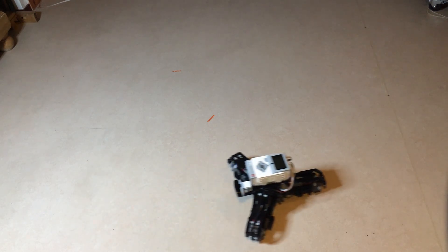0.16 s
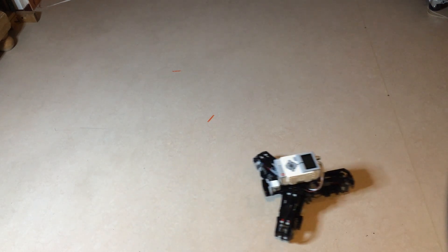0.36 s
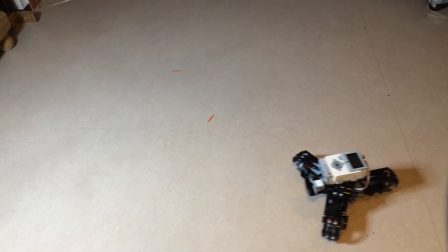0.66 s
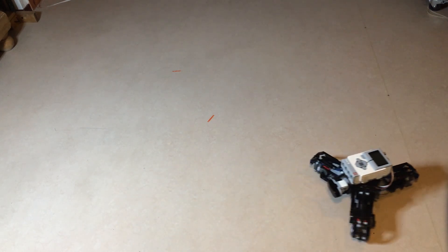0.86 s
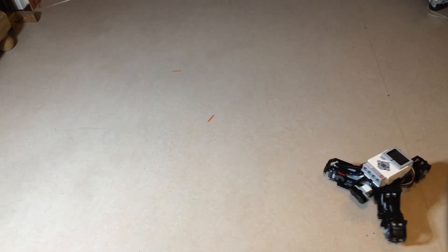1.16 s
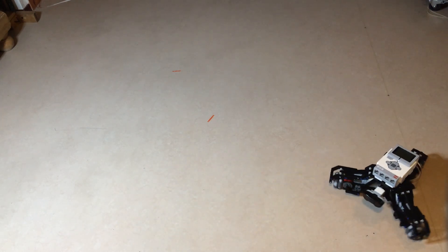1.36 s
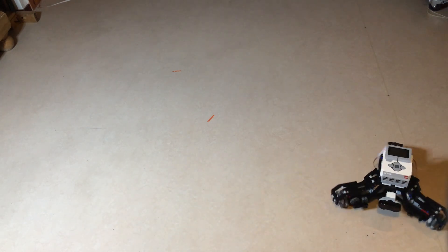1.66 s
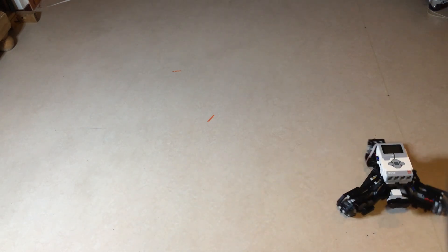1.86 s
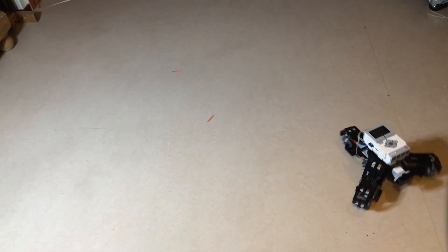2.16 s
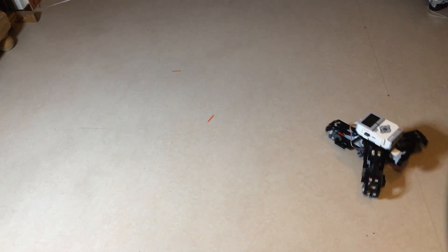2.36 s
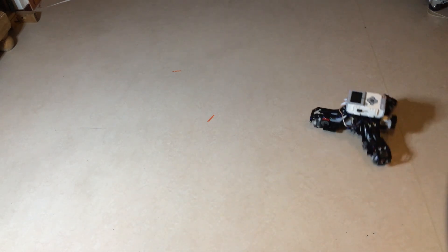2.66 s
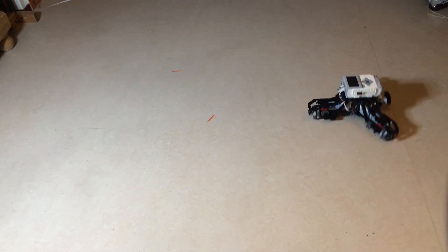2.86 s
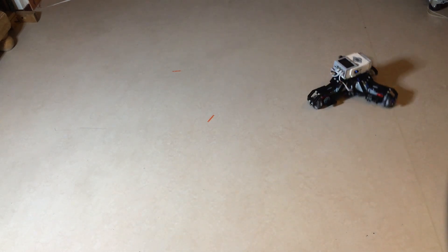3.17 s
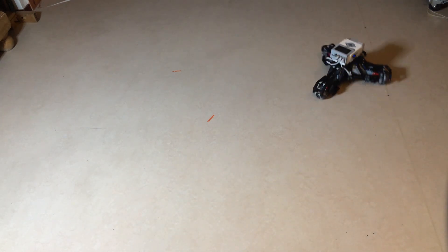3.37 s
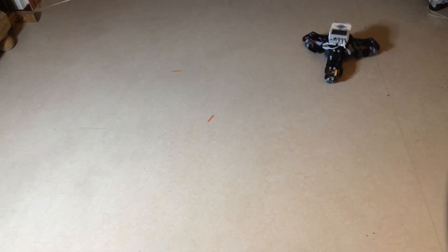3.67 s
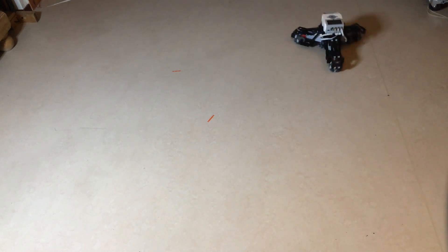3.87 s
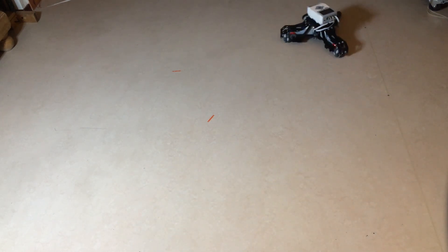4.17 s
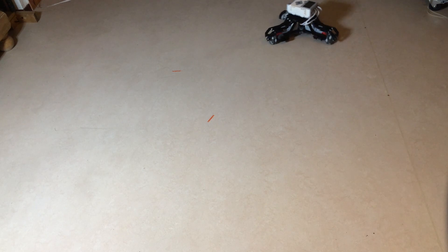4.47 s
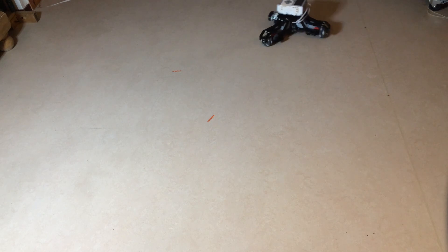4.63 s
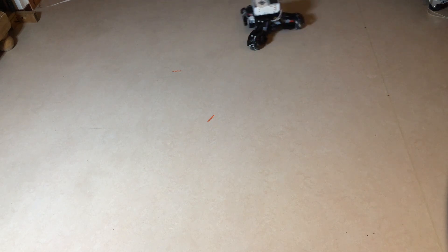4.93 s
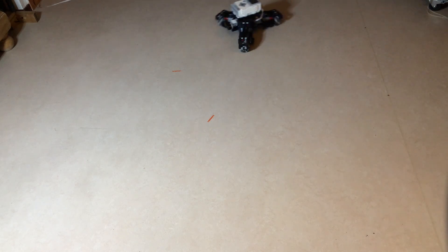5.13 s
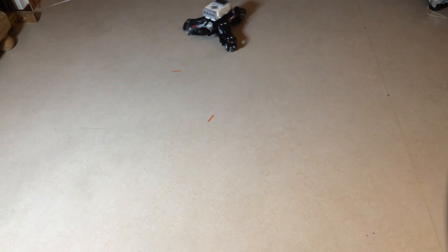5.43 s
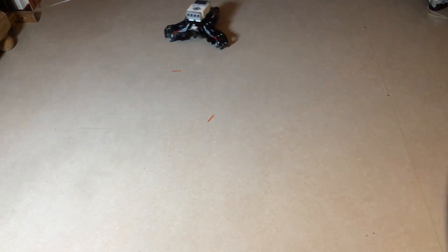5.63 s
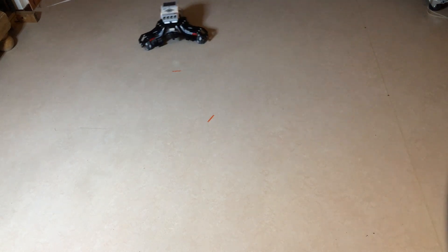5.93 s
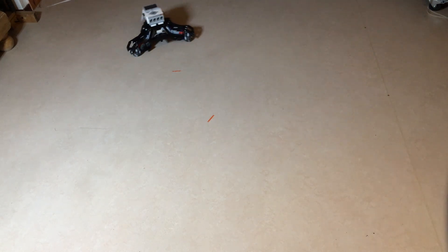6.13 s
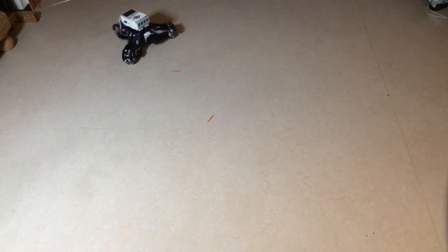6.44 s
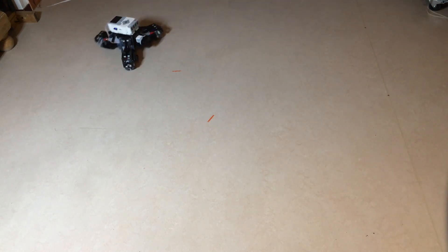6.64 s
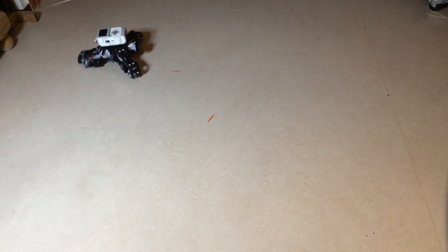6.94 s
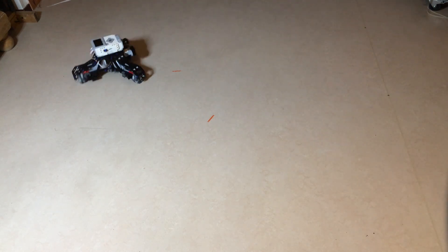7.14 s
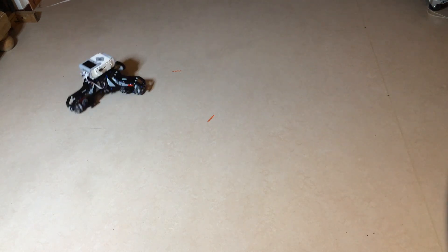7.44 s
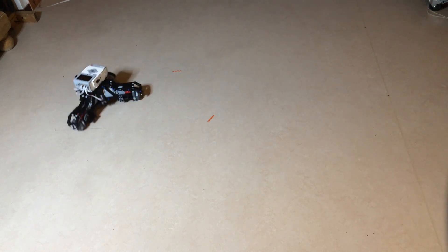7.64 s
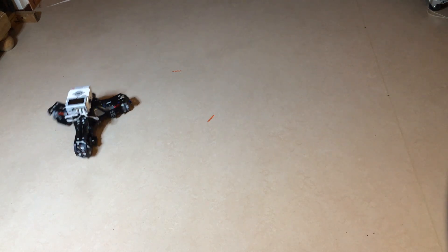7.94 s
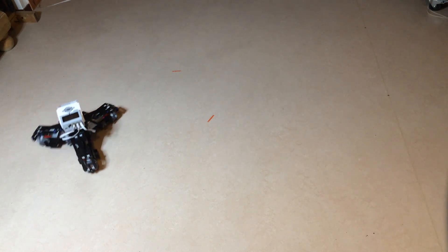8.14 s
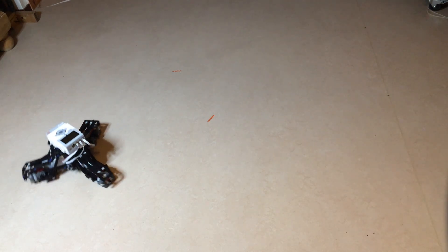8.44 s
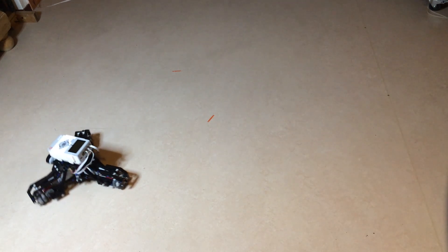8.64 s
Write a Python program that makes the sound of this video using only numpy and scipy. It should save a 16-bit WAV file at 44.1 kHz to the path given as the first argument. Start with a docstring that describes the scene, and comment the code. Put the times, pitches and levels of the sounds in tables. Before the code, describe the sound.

Buzzy electric whirring from a toy robot starts high and busy, glides down to a duller, quieter growl, then revs back up in brighter uneven waves until the end. Gritty gear rattle, tiny ticks and scraping hiss cling to the nasal whine, while a second lower motor swells now and then. The sound is continuous, heard by a fixed microphone in a small room with short echoes and soft low hum.

```python
"""A three-wheeled toy robot spins and drifts in a wide loop over a bare floor, in a quiet humming room.
At first all three geared motors whine and rattle; by 2 s the third has faded and the fastest has slowed.
From then until the end at 8.8 s the fastest speeds up and slows down again and again, while a slower motor
surges at about 2, 3, 5.3, 7.6 and 8.8 s. The whines are harmonics of the rate at which gear teeth meet; the
rattle is filtered noise, ticks and blurred harmonics. Both channels are the same."""
import sys
import numpy as np
from scipy import signal
from scipy.fft import rfft, irfft
from scipy.io import wavfile
from scipy.ndimage import uniform_filter1d

SR = 44100
rng = np.random.default_rng(int(sys.argv[2]) if len(sys.argv) > 2 else 0)


def dump(signal):
    """Clip the signal to [-1, 1] and save it as 16-bit WAV at the path in sys.argv[1]."""
    limited = np.clip(np.atleast_2d(signal).T, -1, 1)
    pcm = np.round(limited * 32767).astype(np.int16)
    wavfile.write(sys.argv[1], SR, pcm)


N = 388080
TIME = np.arange(N) / SR  # seconds

# speed of the fastest motor at each moment: (time [s], tooth rate [Hz])
LEAD_SPEED = [(0.0, 975), (0.6, 981.0), (0.75, 895), (1.0, 762), (1.13, 668.0), (1.32, 581), (1.95, 537),
              (2.05, 566), (2.15, 728), (2.4, 797), (2.59, 953), (2.68, 945), (3.0, 673.3), (3.17, 777.5),
              (3.28, 901), (3.37, 900.0), (3.45, 979), (3.72, 975.5), (3.86, 942.0), (4.02, 821.0),
              (4.13, 777.6), (4.55, 790.7), (4.65, 758.5), (4.8, 813.4), (5.0, 877), (5.23, 764.5),
              (5.3, 679), (5.64, 939.6), (5.83, 999), (5.95, 985), (6.39, 791.3), (6.55, 772.4),
              (6.72, 813), (6.85, 778.5), (7.03, 860), (7.16, 831), (7.4, 919), (7.52, 732.5), (7.62, 692),
              (7.92, 925.0), (8.15, 1000), (8.25, 902), (8.48, 867), (8.8, 771)]
# its whine, before the housing colours it: (time [s], level [dB])
LEAD_WHINE = [(0.0, -52), (0.6, -61), (1.05, -75), (1.75, -64), (2.15, -55.5), (2.65, -47.5), (2.95, -57.5),
              (3.28, -46.5), (3.52, -50.5), (4.6, -52), (5.7, -50), (6.25, -51.5), (6.6, -47), (7.35, -51),
              (7.55, -52), (8.0, -48), (8.8, -56.5)]
# how the housing colours that whine: (frequency [Hz], gain [dB])
WHINE_COLOUR = [(1000.0, -7.5), (1500.0, -2.5), (1850.0, 1), (2100.0, -0.5), (2400.0, -0.5), (2900.0, 2.5),
                (3200.0, -3.5), (3600.0, -5), (3920.0, -4), (4400.0, -9), (4800.0, -4.5), (5450, -3.5),
                (6200, -8), (7000, -9.5), (9000, -20)]
# as the body turns, one harmonic flares up or drops out for a moment;
# harmonic number: (time of the middle [s], length [s], change [dB])
HARMONIC_FLARES = {2: [(.8, .25, 8.5), (1.97, 0.092, 12.5), (2.17, .07, 9), (3.13, .1, 6), (3.78, .12, 9.5),
                   (4.97, 0.079, 7.5), (7.1, .4, -4), (7.39, 0.11, 7.5), (8.05, .32, 6), (8.46, .3, 9.5),
                   (8.76, .08, 10)], 3: [(.21, .32, 3.5), (1.22, 0.29, 15), (1.86, .25, 6), (2.28, .16, -6),
                   (2.55, .25, 3), (3.17, .15, -11), (3.72, .12, 9), (5.53, .06, 6), (6.52, .2, 7),
                   (7.19, .23, 7), (7.5, 0.071, 7)], 4: [(.15, .25, 5), (2.32, .3, -1), (3.2, .16, 4.5),
                   (3.58, 0.24, -14), (4.3, .24, 8.5), (4.82, .24, 13.5), (5.14, .14, 12), (5.48, 0.12, 8),
                   (6.1, 0.44, -25), (7.29, .12, 12.5)], 5: [(1.6, 0.72, -13), (2.08, 0.097, 6),
                   (3.28, .11, 7), (3.58, 0.28, -14), (4.01, .14, -18), (4.4, .13, 8.5), (5.77, .22, 3),
                   (6.65, 0.22, 4.5)]}
# weaker tones, the tooth rate itself and uneven multiples of it:
# (multiple of the tooth rate [times], relative level [dB])
WEAK_TONES = [(1.0, -67), (1.7, -59), (2.3, -62), (3.8, -80), (5.171, -58), (9.25, -53)]
# how well the housing sends out a gear tone: (frequency [Hz], gain [dB])
RADIATION = [(600, -37), (850, -11.5), (1200, -12.5), (1450, -8.5), (1800, -5.5), (2400, -18.5),
             (3000, -7.5), (4200, -10), (7300, -25.5), (9000, -9)]
# a slower motor speeds up from a crawl and drops back:
# (time of the peak [s], tooth rate [Hz], rise [s], fall [s], level before the housing [dB])
SURGES = [(.2, 558.3, 1.6, 1.53, -53.5), (2.08, 565, .25, 1.74, -63.5), (2.98, 690, .42, .24, -49),
          (5.3, 698, .21, .32, -48), (7.56, 695, .14, .5, -48), (8.8, 603.4, 1.1, 0.72, -60)]
# third motor, as the robot sets off: (time [s], tooth rate [Hz], level before the housing [dB])
THIRD_MOTOR = [(0, 616, -48), (.6, 608, -47.5), (1.0, 515.3, -55), (1.4, 425.7, -57), (2.2, 400, -85)]
# gear rattle, used as changes from its usual levels:
# (time [s], upper-middle level [dB], treble level [dB])
RATTLE_LEVELS = [(0.0, -48.5, -56), (0.12, -47, -60), (0.73, -48, -54.5), (1.27, -57, -61),
                 (1.86, -56.5, -62), (2.13, -50, -54), (2.62, -45, -51.5), (3.01, -48.5, -54),
                 (3.36, -48, -50.5), (3.58, -52, -49), (3.7, -49, -48.5), (4.07, -55, -55.5),
                 (4.31, -52, -52.5), (4.48, -54, -55), (4.88, -50, -54.5), (4.97, -49, -50.5),
                 (5.51, -46.5, -52), (6.57, -53, -55), (7.08, -50, -49), (7.38, -46.5, -49),
                 (7.6, -48.5, -52.5), (7.89, -46, -50), (8.6, -48.5, -46), (8.8, -46.5, -52.5)]
# middles of the four rattle bands: (frequency [Hz])
RATTLE_BAND_HZ = [1700, 3920, 8400, 13100]
# basic colour of the rattle: (frequency [Hz], gain [dB])
RATTLE_COLOUR = [(290, -58), (500, -24.5), (637, -25), (1170, -12.5), (1830, -0.5), (2430, -3), (3270, 1.5),
                 (3610, 1), (3940, -0.5), (4350, -1.5), (4800, 1), (6570, -3.5), (12100, -3), (14200, -8.5),
                 (15000, -13)]
# resonances of the plastic housing: (frequency [Hz], width [Hz], lift [dB])
HOUSING = [(1720, 180, 0.5), (3000, 160, 1), (3920, 320, 3.5), (5140, 420, 2), (5430, 300, 2.5),
           (7090, 840, 3), (8200, 220, 0.5)]
# colour of the soft noise in the room: (frequency [Hz], relative level [dB])
ROOM_TONE = [(15, -41), (25, -37), (49, -8), (113, -9.5), (140, -5.5), (182, -4.5), (211, -4), (254, -9),
             (399, -9.5), (448, -13.5), (541, -12.5), (634, -18), (800, -14.5), (1040, -11), (1760, -120)]
# steady hum in the room: (frequency [Hz], relative level [dB])
HUM = [(58, -80.5), (90, -78.5), (120, -75.5), (172, -78), (213, -69)]

FADE_DB, FADE_HZ = 1.6, 3.3  # each whine harmonic also swells and fades by chance
HIGH_DB = -1  # trim of the lead motor's high harmonics
CRAWL_HZ, CRAWL_DB = 396.3, -69  # the slower motor between surges, before the housing
RATTLE_USUAL_DB, TREBLE_USUAL_DB = -52, -54.5  # table levels that count as no change
CRUISE_HZ, DULL_DB_PER_OCTAVE = 843, 5  # slower gears have more low rattle
LOW_LIFT_DB, MIDDLE_LIFT_DB = 3, -2.3
LOW_SHARE, MIDDLE_SHARE, TILT_SHARE = 0.88, 0.72, 0.31  # how far the bands follow the levels
SOLO_THIN_DB = 3  # a motor running alone leaves less low rattle
ROOM_TONE_DB = -69.5
EDGE_HZ = 15300  # top of the treble


def gain_of(db):
    """Turns decibels into a factor for loudness of a wave (its amplitude)."""
    return 10 ** (np.asarray(db) / 20)


def evened(x):
    """Scales a signal to an average strength (rms) of 1."""
    return x / np.sqrt(np.mean(x ** 2) + 1e-20)


def curves(rows):
    """Joins the points of each time-table column with straight lines, sample by sample."""
    times, *columns = np.transpose(rows)
    return [np.interp(TIME, times, column) for column in columns]


def read(points, hz):
    """Reads a frequency table at hz, with octaves evenly spaced."""
    frequencies, values = np.transpose(points)
    return np.interp(np.log(hz + 1), np.log(frequencies + 1), values)


def coloured(x, db_at):
    """Makes each frequency louder or softer by db_at(frequency) decibels."""
    hz = np.fft.rfftfreq(N, 1 / SR)
    return irfft(rfft(x) * gain_of(db_at(hz)), N)


def wander(rate_hz):
    """Slow random motion of rms 1, with little movement faster than rate_hz."""
    count = N // 32  # a coarse time grid is enough
    hz = np.fft.rfftfreq(count, N / SR / count)
    spectrum = rfft(rng.standard_normal(count)) / (1 + (hz / rate_hz) ** 2)
    slow = evened(irfft(spectrum, count))
    return np.interp(TIME, np.linspace(0, N / SR, count), slow)


def tooth_phase(hz, wobble, wobble_hz):
    """Angle of the tooth cycle; the uneven load makes the speed wobble."""
    wobbling_hz = hz * (1 + wobble * wander(wobble_hz))
    return 2 * np.pi * np.cumsum(wobbling_hz) / SR


def gear_tone(phase, rough, rough_hz):
    """One harmonic of meshing gears; unequal teeth scatter its strength and phase."""
    turn = phase + rng.uniform(0, 2 * np.pi)
    in_step = (1 + rough * wander(rough_hz)) * np.cos(turn)
    out_of_step = rough * wander(rough_hz) * np.sin(turn)
    return evened(in_step + out_of_step)


def whine_db(k, hz):
    """Level of tooth harmonic k as it glides through the housing's colour, flares and fades."""
    level_db, = curves(LEAD_WHINE)
    flares_db = sum(db * np.exp(-(2 * (TIME - middle) / length) ** 2)
                    for middle, length, db in HARMONIC_FLARES.get(k, []))
    return level_db + read(WHINE_COLOUR, k * hz) + flares_db + FADE_DB * wander(FADE_HZ)


def lead_motor(phase, hz, effort_db, solo):
    """Strong tooth harmonics, higher ones that grow with solo, and faint tones that follow the gear load."""
    grip = gain_of(0.34 * wander(38))  # the teeth press and slacken
    rough = 0.75 - 0.26 * solo  # the other motors shake the gears
    whine = sum(gain_of(whine_db(k, hz)) * gear_tone(k * phase, rough, rough_hz=51.0)
                for k in range(2, 6))
    high = sum(gain_of(whine_db(k, hz)) * gear_tone(k * phase, rough=0.43, rough_hz=40)
               for k in range(6, 11))
    faint = sum(gain_of(db + read(RADIATION, k * hz) + 2.6 * wander(2.7))
                * gear_tone(k * phase, rough=0.82, rough_hz=31.4) for k, db in WEAK_TONES)
    strong = grip * (whine + gain_of(HIGH_DB) * solo * high)
    return strong + gain_of(-3.5 + 0.7 * effort_db) * faint


def surging():
    """Tooth rate and level of the slower motor: it grows louder as each surge lifts it from a crawl."""
    nearness = np.array([np.exp(-np.maximum((peak - TIME) / rise, (TIME - peak) / fall))
                         for peak, _, rise, fall, _ in SURGES])
    _, top_hz, _, _, top_db = np.transpose(SURGES)[:, :, None]
    hz = CRAWL_HZ + np.max(nearness * (top_hz - CRAWL_HZ), axis=0)
    level_db = CRAWL_DB + np.max(nearness * (top_db - CRAWL_DB), axis=0)
    return hz, level_db


def slower_motor(hz, level_db):
    """The same kind of gears turning more slowly: tooth harmonics sent out by the housing."""
    phase = tooth_phase(hz, wobble=0.00585, wobble_hz=16.8)
    return sum(gain_of(level_db + read(RADIATION, k * hz)) * gear_tone(k * phase, rough=0.82, rough_hz=41.7)
               for k in (2, 3, 4, 5, 6, 8, 12))


def rattle_db(tooth_hz, solo):
    """Change of each rattle band: slow gears and several motors favour the low end; middle yields to treble."""
    level_db, treble_db = curves(RATTLE_LEVELS)
    level_db = level_db - RATTLE_USUAL_DB
    treble_db = treble_db - TREBLE_USUAL_DB
    dull_db = DULL_DB_PER_OCTAVE * np.log2(CRUISE_HZ / tooth_hz)
    low_db = LOW_LIFT_DB + LOW_SHARE * level_db + dull_db - SOLO_THIN_DB * solo
    middle_db = MIDDLE_LIFT_DB + MIDDLE_SHARE * level_db - TILT_SHARE * (treble_db - level_db)
    return [low_db, middle_db, level_db, treble_db]


def housing_db(hz):
    """Colour of the rattle: a broad hiss lifted at the housing's resonances."""
    lifts_db = sum(db / (1 + (2 * (hz - middle) / width) ** 2) for middle, width, db in HOUSING)
    return read(RATTLE_COLOUR, hz) + lifts_db


def dispersed(x, ring_s=0.003988):
    """The housing rings on briefly, holding each frequency back by its own time, up to ring_s."""
    hz = np.fft.rfftfreq(N, 1 / SR)
    delay_s = np.interp(hz, np.linspace(0, SR / 2, num=120), ring_s * rng.random(size=120))
    turn = 2 * np.pi * np.cumsum(delay_s) * SR / N  # adding up delays gives the phase
    return irfft(rfft(x) * np.exp(-1j * turn), N)


def patchy(x, depth_db=1.85, count=40):
    """Small patches of the rattle swell and fade at random over frequency and time."""
    _, _, spectrum = signal.stft(x, SR, nperseg=512)
    patches = uniform_filter1d(rng.standard_normal(spectrum.shape), size=4, axis=0)  # over frequency
    patches = uniform_filter1d(patches, size=count, axis=1)  # over time
    _, moving = signal.istft(spectrum * gain_of(depth_db * evened(patches)), SR, nperseg=512)
    return moving[:N]


def rattle_band(noise, weights):
    """The part of the noise around one rattle band, overlapping its neighbours."""
    points = list(zip(RATTLE_BAND_HZ, weights))
    return coloured(noise, lambda hz: 20 * np.log10(read(points, hz) + 1e-9))


def rattle(phase, tooth_hz, solo, bite=0.27, tick_share=0.38, ticks_per_s=700, flutter_db=0.37):
    """Loose teeth buzz and scrape; backlash and rollers add tiny ticks. The buzz grows with solo."""
    blur_hz = 8500
    # the teeth land unevenly, which blurs their highest harmonics into hiss
    harmonics = (gear_tone(k * phase, rough=3.5, rough_hz=45 + 7 * k) / (1 + (k * tooth_hz / blur_hz) ** 4)
                 for k in range(4, 13))
    buzz = 0.7 * evened(sum(harmonics))
    scrape = rng.standard_normal(N) * np.exp(bite * np.cos(phase))  # stronger once per tooth
    ticks = (rng.random(N) < ticks_per_s / SR) * rng.standard_normal(N)
    drive = evened(scrape) + solo * buzz + tick_share * evened(ticks)
    noise = evened(patchy(coloured(dispersed(drive), housing_db)))
    # the turning body shows different sides, so the colour shifts
    bands = [rattle_band(noise, weights) for weights in np.eye(len(RATTLE_BAND_HZ))]
    shaped = sum(gain_of(db + 0.83 * wander(25)) * band
                 for db, band in zip(rattle_db(tooth_hz, solo), bands))
    return gain_of(-45.5 + flutter_db * wander(30)) * shaped


def room(x, wet_db=-7, t60=0.34, drift_hz=1.0915, count=3):
    """Direct sound and short scattered echo tails, which trade places as the robot moves."""
    t = TIME[:SR // 2]
    wet = np.zeros(N)
    for k in range(count):
        sparse = (rng.random(len(t)) < 0.05) * (t > 0.003)  # echoes start after 3 ms
        tail = rng.standard_normal(len(t)) * sparse * gain_of(-60 * t / t60)  # 60 dB down after t60 s
        share = np.sqrt(2 / count) * np.cos(np.pi * (drift_hz * TIME + k / count))
        wet += signal.fftconvolve(x * share, tail / np.linalg.norm(tail))[:N]
    return (x + gain_of(wet_db) * wet) / np.hypot(1, gain_of(wet_db))


def room_tone():
    """Soft low filtered noise and a slightly unsteady hum of separate tones."""
    air = coloured(rng.standard_normal(N), lambda hz: read(ROOM_TONE, hz))
    hum = sum(gain_of(db) * gear_tone(2 * np.pi * hz * TIME, rough=0.083, rough_hz=4.3) for hz, db in HUM)
    return gain_of(ROOM_TONE_DB) * evened(air) + gain_of(-1.5) * hum


def scene():
    """The three motors and their rattle in the room."""
    lead_hz, = curves(LEAD_SPEED)
    lead_phase = tooth_phase(lead_hz, wobble=0.0055, wobble_hz=19)
    second_hz, second_db = surging()
    third_hz, third_db = curves(THIRD_MOTOR)
    # solo (between 0 and 1) is higher the quieter the other two motors are
    solo = 1 / np.hypot(1, gain_of(np.maximum(second_db, third_db) + 72))
    effort_db = np.mean(rattle_db(lead_hz, solo), axis=0)
    robot = lead_motor(lead_phase, lead_hz, effort_db, solo)
    robot += slower_motor(second_hz, second_db)
    robot += slower_motor(third_hz, third_db)
    robot += rattle(lead_phase, lead_hz, solo)
    return np.tile(room(robot) + room_tone(), (2, 1))


def record(dry):
    """Cuts off the treble above EDGE_HZ with a steep filter."""
    lowpass = signal.firwin(1023, EDGE_HZ, window=("kaiser", 9), fs=SR)
    return signal.oaconvolve(dry, lowpass[None], "same")


dry = scene()
out = record(dry)
dump(out)
```